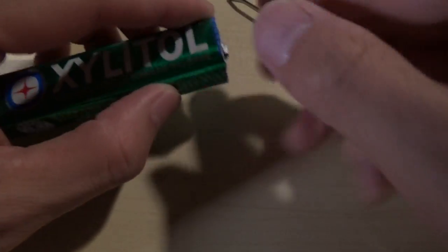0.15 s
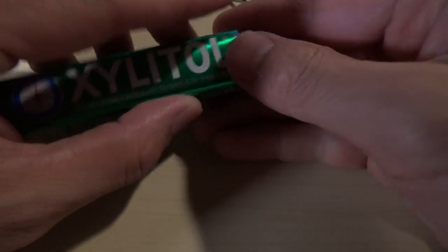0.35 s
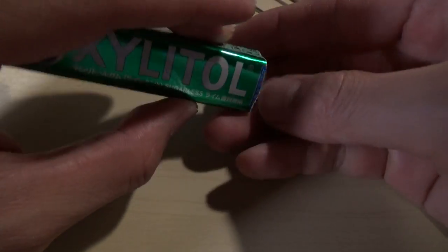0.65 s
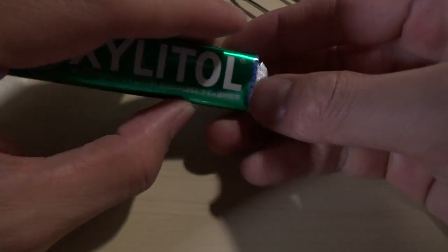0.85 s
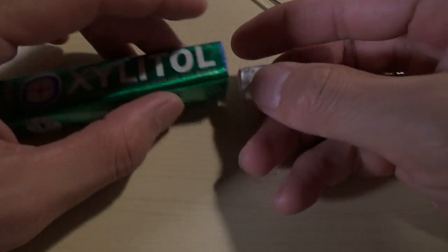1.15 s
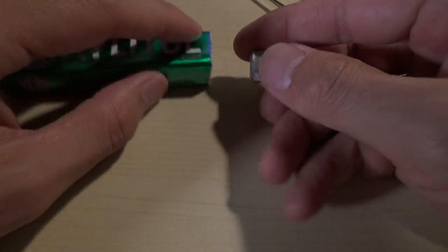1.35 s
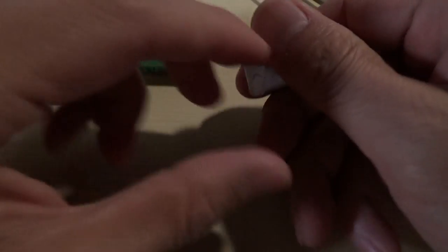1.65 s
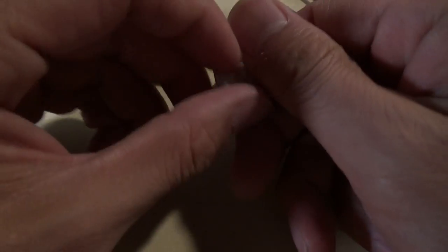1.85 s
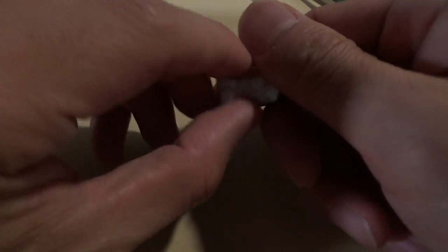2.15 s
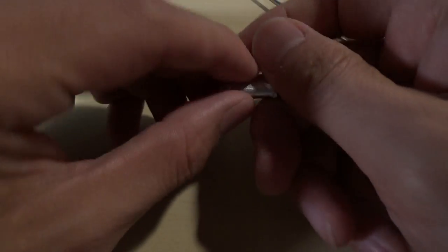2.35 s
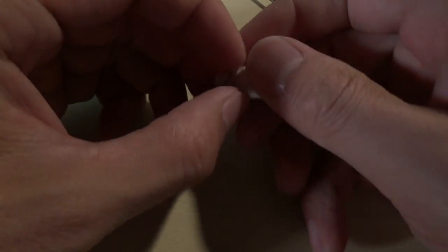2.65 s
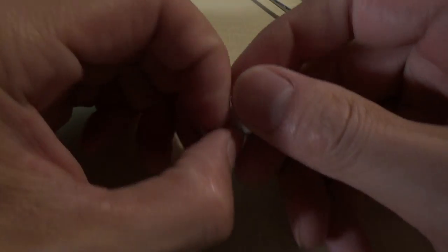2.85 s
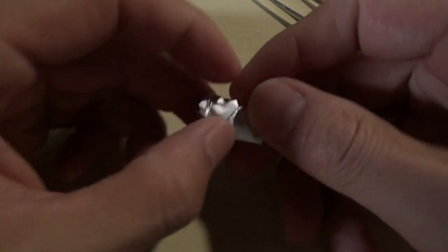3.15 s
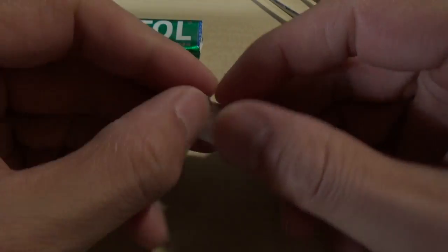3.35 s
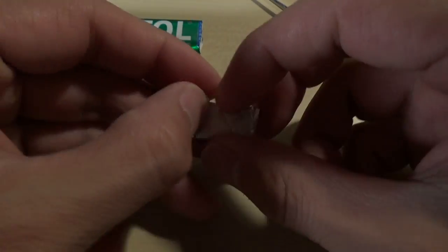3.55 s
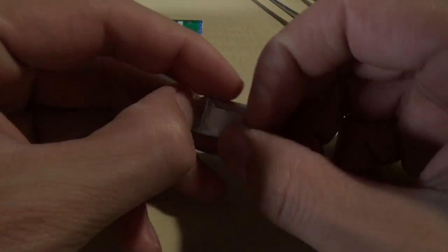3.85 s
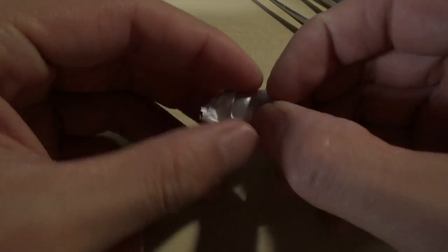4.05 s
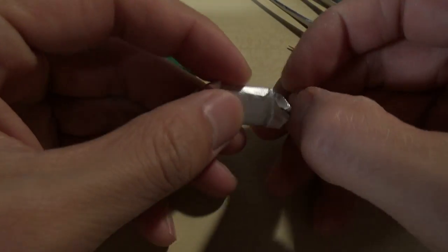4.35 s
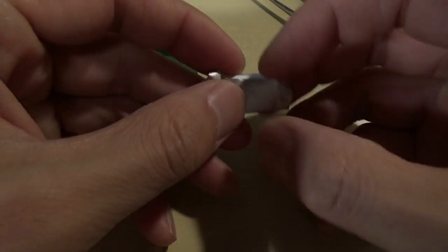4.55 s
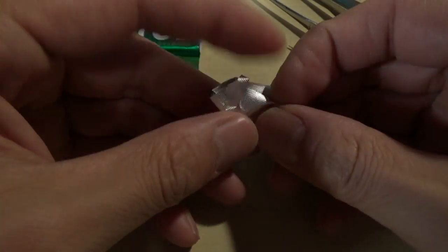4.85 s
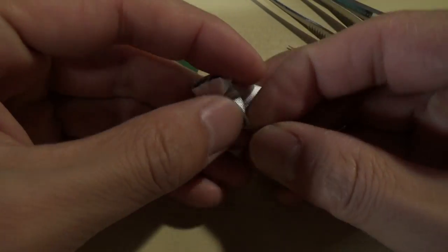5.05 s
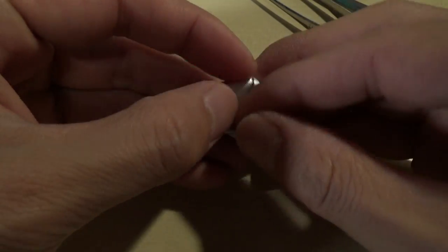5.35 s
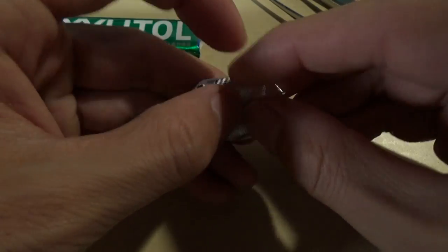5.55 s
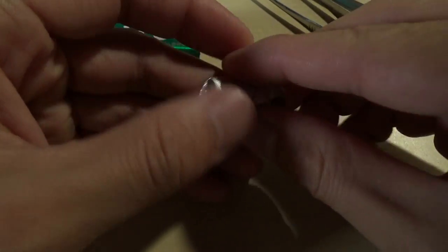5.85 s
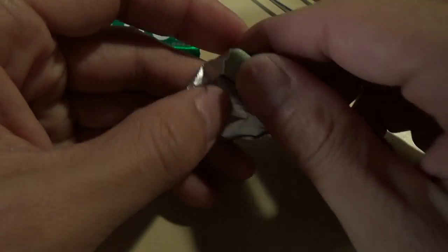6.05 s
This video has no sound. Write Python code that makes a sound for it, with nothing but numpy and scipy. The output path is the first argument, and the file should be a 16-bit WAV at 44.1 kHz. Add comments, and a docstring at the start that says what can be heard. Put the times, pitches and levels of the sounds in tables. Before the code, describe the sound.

Dull scuffs and knocks of a small pack, then sharp foil crinkling in clustered bursts, close by, over a faint low indoor hum.

```python
"""At a table in a quiet room, fingers slide a wrapped sweet out of a small stick pack and unfold its foil.
Creases snap as bursts of damped modes, and stuck folds peel open as fast trains of the same clicks.
The sheet rustles as clicks fed to short resonances, and a stiff fold rasps as filtered dense clicks.
Early on, scuffs and friction noise ring the pack's modes, and clicks ring steel tools on the table.
Below lie banded room noise and a faint hum of wavering sines."""
import sys
import numpy as np
from scipy import signal
from scipy.io import wavfile

SR = 44100
rng = np.random.default_rng(int(sys.argv[2]) if len(sys.argv) > 2 else 0)


def to_wav(s):
    """Save 16-bit WAV."""
    ch = np.atleast_2d(s).T  # columns
    pcm = np.round(np.clip(ch, -1, 1) * 32767)  # PCM
    wavfile.write(sys.argv[1], SR, pcm.astype(np.int16))


def to_linear_factor(level_db):
    """Convert decibel levels (scalar or array-like) to linear amplitude factors."""
    exponent = np.asarray(level_db, float) / 20
    return 10 ** exponent


N = 273861   # length in samples

# Spectrum of the room noise. Each row: frequency in Hz, relative density in dB.
ROOM_SPECTRUM = [(25, -1), (70, 0), (160, 1.5), (280, 10.5), (460, -5.5), (830, -0.5), (1500, -33),
                 (4500, -17.5), (16000, -24)]
ROOM_DB = -56.5   # rms, before the sides are lowered
# Hum lines. Each row: frequency in Hz, average level in dB rms, pitch wander in Hz.
HUM_LINES = [(99.9, -59.5, 3.13), (119.7, -62.5, 4.85), (211.9, -65, 6.08)]

# Fingers and contents rubbing the pack. Each row: peak time in seconds, drive level in dB,
# build-up in seconds, die-away in seconds.
RUBS = [(0.0, -42.5, 0.037, 0.084), (0.498, -56.5, 0.03, 0.52), (0.685, -39.5, 0.045, 0.032),
        (0.943, -45, 0.021, 0.058), (1.12, -35.5, 0.066, 0.1), (1.417, -49.5, 0.14, 0.13),
        (3.4, -58, 0.96, 0.38)]
PACK_AT_REST_DB = -64.5   # drive level between rubs
# Pack or table bumped. Each row: time in seconds, drive level in dB.
KNOCKS = [(0.297, -31.5), (0.503, -36.5), (0.6877, -18), (0.8474, -24), (1.105, -14.5), (4.336, -25.5)]
CONTACT_S = 0.006   # time for a knock's scuff to die by 60 dB
# Modes of the pack. Each row: frequency in Hz, relative strength in dB, time to die by 60 dB in seconds.
PACK_MODES = [(452, 1.5, 0.02), (800, 8, 0.011), (1227, 13, 0.0047), (1790, 12.5, 0.0036),
              (2810, 20.5, 0.0012)]

# Finger pushes that rustle the sheet. Each row: peak time in seconds, level in dB,
# build-up in seconds, die-away in seconds.
PUSHES = [(0.0, -37.5, 0.043, 0.049), (0.294, -37, 0.057, 0.039), (0.384, -38.5, 0.0049, 0.014),
          (0.498, -39.5, 0.029, 0.041), (0.561, -43, 0.082, 0.1), (0.86, -44.5, 0.047, 0.065),
          (0.677, -25.5, 0.02, 0.022), (0.732, -30.5, 0.018, 0.027), (0.936, -36.5, 0.0017, 0.07),
          (1.093, -34.5, 0.025, 0.15), (1.239, -35, 0.077, 0.018), (1.366, -43, 0.029, 0.47),
          (1.489, -41, 0.17, 0.0069), (1.669, -34.5, 0.042, 0.041), (1.915, -43, 0.29, 0.063),
          (2.201, -42.5, 0.059, 0.039), (2.337, -28.5, 0.077, 0.02), (2.624, -37.5, 0.064, 0.048),
          (2.8, -34, 0.016, 0.035), (2.845, -21, 0.0043, 0.02), (2.913, -18.5, 0.0074, 0.054),
          (3.103, -22.5, 0.032, 0.023), (3.212, -37, 0.37, 0.19), (3.36, -40, 0.083, 0.16),
          (3.66, -40, 0.27, 0.062), (3.86, -36.5, 0.089, 0.041), (3.971, -30, 0.053, 0.017),
          (4.065, -30, 0.019, 0.077), (4.332, -21.5, 0.072, 0.0039), (4.426, -37.5, 0.15, 0.0089),
          (4.499, -43, 0.04, 0.045), (4.76, -43, 0.12, 0.14), (4.96, -35.5, 0.039, 0.13),
          (5.162, -21.5, 0.073, 0.02), (5.2, -30.5, 0.12, 0.023), (5.379, -35, 0.23, 0.26),
          (5.44, -22, 0.0089, 0.086), (5.577, -29.5, 0.005, 0.046), (5.686, -31.5, 0.029, 0.19),
          (5.915, -28.5, 0.044, 0.016), (5.952, -33.5, 0.12, 0.15), (6.088, -47, 0.011, 0.68)]
RESTING_DB = -59   # fingers just holding the sheet
SWELL_DB = 20   # every build-up and die-away is the time to cross this range
# Colour of the small creases. Each row: frequency in Hz, relative level in dB.
FOIL_SPECTRUM = [(4600, -17.5), (6000, -1.5), (9000, 5), (12000, 2.5), (15500, -3)]
# Colour of the large folds. Each row: frequency in Hz, relative level in dB.
FOLD_SPECTRUM = [(1400, -12), (2400, -9), (3300, -1.5), (4800, -12), (15500, -4)]
# How large the folds in hand are. Each row: time in seconds, relative share of the rustle in dB.
FOLD_SHARE = [(0.0, 0), (0.96, 2), (1.22, -17), (1.33, 5), (1.6, -14), (2.9, -20), (3.1, -14),
              (4.95, -17.5), (5.15, -12), (5.4, -15), (5.72, -8.5), (5.91, -9.5), (6.21, -16)]
DULLING_DB_PER_OCTAVE = -1.18   # above 9 kHz, for each dB of large-fold share

# Small steel tools chattering when the table is jolted. Each row: peak time in seconds, drive level in dB,
# build-up in seconds, die-away in seconds.
RATTLES = [(0.008, -34, 0.031, 0.033), (0.73, -36, 0.018, 0.042), (1.156, -31, 0.011, 0.013),
           (1.178, -30.5, 0.025, 0.021)]
# Modes of the tools. Each row: frequency in Hz, relative strength in dB.
TOOL_MODES = [(285, -11), (600, 2.5), (755, -0.5), (1040, -7), (1290, -3), (3500, -0.5), (5850, -5.5),
              (7060, 1), (9130, -3)]
TOOLS_T60_S = 0.034   # time for a tool to die by 60 dB

# Creases snapping. Each row: time in seconds, peak level in dB, pitch in Hz.
SNAPS = [(0.249, -17.5, 8500), (0.309, -21.5, 5560), (0.5121, -19, 8550), (0.69, -15.5, 3260),
         (0.9499, -11.5, 2480), (1.0433, -15.5, 8100), (1.089, -21, 9700), (1.1053, -7, 2720),
         (1.2194, -15, 9600), (2.0594, -20, 11900), (2.098, -19.5, 11700), (2.292, -15, 10800),
         (2.7306, -17, 7300), (2.765, -23.5, 8040), (2.798, -13.5, 11200), (2.83, -9.5, 10100),
         (2.836, -22, 9100), (2.9023, -6, 9400), (2.9318, -5.5, 8900), (3.0544, -19, 8300),
         (3.07, -12, 8550), (3.092, -11, 6840), (3.102, -8.5, 9000), (3.1144, -5.5, 8800), (3.13, -6, 8300),
         (3.2474, -34, 10400), (3.344, -18, 12000), (3.3535, -7.5, 11100), (3.359, -22, 11900),
         (3.6866, -17.5, 9100), (3.691, -19, 12000), (3.7273, -11, 9900), (3.732, -6.5, 7200),
         (3.8945, -12.5, 14800), (3.928, -7, 11100), (3.935, -22, 10600), (3.951, -20, 8240),
         (4.0726, -12.5, 8600), (4.078, -15, 8950), (4.1531, -11, 10300), (4.1657, -12, 10900),
         (4.1762, -9, 11200), (4.187, -10, 11400), (4.202, -9.5, 11800), (4.2135, -6, 11700),
         (4.25, -12, 10600), (4.259, -11, 9300), (4.3175, -33, 10400), (4.326, -5, 7960), (4.337, -5, 6900),
         (4.375, -16.5, 10400), (4.381, -21, 9900), (4.619, -24, 11000), (4.652, -17, 8500),
         (4.704, -22, 5700), (4.7157, -5.5, 13800), (4.9764, -8, 9300), (5.129, -18, 6100),
         (5.296, -14, 7860), (5.301, -24, 6640), (5.32, -14, 9000), (5.3242, -10, 11100),
         (5.4264, -6.5, 9150), (5.431, -11.5, 7500), (5.4415, -8, 6500), (5.4865, -8.5, 9300),
         (5.5088, -5, 10600), (5.519, -12, 10100), (5.532, -7, 9450), (5.5415, -4, 8950),
         (5.572, -14, 10600), (5.583, -6.5, 8500), (5.5902, -12, 8200), (5.617, -16.5, 7700),
         (5.6255, -15.5, 8200), (5.655, -13.5, 6370), (5.6983, -8.5, 6300), (5.729, -9.5, 5970),
         (5.814, -21, 8400), (5.8423, -22, 9400), (5.889, -12.5, 7860), (5.9461, -11.5, 11200),
         (6.0045, -11.5, 4430), (6.042, -20.5, 10700), (6.0992, -18.5, 11200), (6.1105, -26, 12400),
         (6.1951, -14.5, 14300)]

# A stiff fold dragged under the thumb. Each row: peak time in seconds, level in dB,
# build-up in seconds, die-away in seconds.
RASPS = [(1.13, -47, 0.048, 0.061), (5.25, -51, 0.037, 0.2), (5.42, -40, 0.17, 0.13)]

# Folds peeling open in stick-slip. Each row: start in seconds, end in seconds, first slips per second,
# first level in dB, pitch in Hz.
PEELS = [(2.838, 2.88, 500, -16, 10700), (2.901, 2.924, 410, -11.5, 9500),
         (3.6384, 3.6736, 360, -11, 11400), (4.221, 4.2367, 420, -7.5, 11400),
         (4.2395, 4.248, 260, -13, 9200), (5.662, 5.7, 220, -13, 8300), (5.702, 5.736, 250, -15.5, 10100),
         (5.9074, 5.93, 325, -10, 11500), (6.148, 6.187, 110, -25, 11600)]
PEEL_SPEEDS_UP, PEEL_FADES_DB = 1.25, 3   # rate ratio and fade in dB from start to end


def rms_one(x):
    """Scale to rms 1."""
    return x / np.sqrt(np.mean(x ** 2) + 1e-20)


def at_hz(points, hz):
    """Read a spectrum in dB along a logarithmic frequency axis."""
    table_hz, table_db = np.transpose(points)
    return np.interp(np.log(hz), np.log(table_hz), table_db)


def cut(x, hz, kind, order=4):
    """Steep high- or low-pass."""
    return signal.sosfilt(signal.cheby1(order, 1, hz, kind, fs=SR, output="sos"), x)


def drift(rate):
    """Slow random wander of rms 1, from noise smoothed twice at a corner in Hz."""
    r = np.exp(-40 * np.pi * rate / SR)   # drawn at a twentieth of the sample rate
    noise = rng.standard_normal(N // 20 + 2002)
    slow = signal.lfilter([1], [1, -2 * r, r * r], noise)[2000:]
    return np.interp(np.arange(N) / 20, np.arange(len(slow)), rms_one(slow))


def ring(drive, hz, t60):
    """One damped mode; a unit click rings at about height 1 and dies by 60 dB in t60 seconds."""
    r = to_linear_factor(-60 / (t60 * SR))
    w = 2 * np.pi * hz / SR
    return signal.lfilter([0, np.sin(w)], [1, -2 * r * np.cos(w), r * r], drive + 1e-18)


def clicks(per_s, size_db, clump_db=4.5):
    """Clumped random clicks of uneven size and either sign; rms 1."""
    sizes = to_linear_factor(size_db * np.minimum(rng.exponential(1, N), 6)) * rng.choice([-1, 1], N)
    chance = per_s * to_linear_factor(clump_db * drift(60)) / SR
    return rms_one(sizes * (rng.random(N) < chance))


def swells(rows, rest_db):
    """Each movement swells evenly in dB to its peak and dies away; powers add over rest; result in dB."""
    t = np.arange(0, N + 32, 32) / SR
    power = to_linear_factor(2 * rest_db)
    for s, db, build, die in rows:
        fall = SWELL_DB * np.maximum((s - t) / build, (t - s) / die)
        power = power + to_linear_factor(2 * (db - fall))
    return np.interp(np.arange(N) / SR, t, 10 * np.log10(power))


def dullness(s):
    """Share of the large folds at time s, in dB."""
    return np.interp(s, *np.transpose(FOLD_SHARE))


def add(out, s, sound):
    """Lay a short sound at time s."""
    i = int(s * SR)
    out[i:i + len(sound)] += sound[:N - i]


def room_noise():
    """Half-octave bands of mid and side noise that flicker a little, with narrow wavering hum lines."""
    out = 0
    edges = 25 * 2 ** np.arange(0, 9.6, .5)
    white = rng.standard_normal((2, 2, N))   # neighbouring bands take different noise
    for k, (low, high) in enumerate(zip(edges, edges[1:])):
        band_pass = signal.butter(2, [low, high], "band", fs=SR, output="sos")
        band = signal.sosfilt(band_pass, white[k % 2])
        out = out + band * to_linear_factor(at_hz(ROOM_SPECTRUM, np.sqrt(low * high)) + 3.67 * drift(16.7))
    mid, side = to_linear_factor(ROOM_DB) * cut(rms_one(out), 20000, "low", order=8)
    for hz, db, width in HUM_LINES:
        phase = 2 * np.pi * np.cumsum(hz + width * drift(5.06)) / SR
        mid = mid + np.sqrt(2) * to_linear_factor(db + 2.5 * drift(8)) * np.sin(phase)
    return mid + to_linear_factor(-10) * cut(side, 90, "high", order=2) * [[1], [-1]]


def pack():
    """Friction noise and knocks drive the same damped modes; each knock strikes them in new proportions."""
    rub_db = swells(RUBS, PACK_AT_REST_DB)
    friction = rng.standard_normal(N) * to_linear_factor(rub_db + 1.37 * drift(60))
    knock_s, knock_db = np.transpose(KNOCKS)
    at = (knock_s * SR).astype(int)
    # a knock is a short ragged scuff
    scuff = to_linear_factor(-60 * np.arange(400) / (CONTACT_S * SR)) * rng.standard_normal(400)
    scuff = cut(scuff / np.linalg.norm(scuff), 3600, "low", order=1)
    out = np.zeros(N)
    for hz, db, t60 in PACK_MODES:
        blows = np.zeros(N)
        blows[at] = to_linear_factor(knock_db + db - 14 + rng.normal(0, 4, len(at)))
        rubbing = friction * to_linear_factor(db - 24 + 3 * drift(10))
        out += ring(rubbing + signal.lfilter(scuff, [1], blows), hz, t60)
    return cut(cut(out, 4600, "low", order=2), 152, "high", order=2)


def grains(pitches, spectrum, ticks, cycles, tilt_db):
    """Tiny clicks dealt to short resonances of wandering strength; the larger ticks reach them all."""
    fine = clicks(20000, size_db=4.0, clump_db=3.0)
    dealt = rng.integers(0, len(pitches), N)
    out = 0
    for k, hz in enumerate(pitches):
        drive = fine * (dealt == k) + (-1) ** k * ticks
        voice = rms_one(ring(drive, hz, cycles / hz))
        octaves_up = max(np.log2(hz / 9000), 0)
        db = at_hz(spectrum, hz) + tilt_db * octaves_up + 3.5 * drift(6)
        out = out + voice * to_linear_factor(db) * np.sqrt(hz)
    return rms_one(out)


def rustle():
    """Many small creases at once: bright grains, and broader, duller ones from the larger folds."""
    low_db = dullness(np.arange(N) / SR)
    snap_s, snap_db, _ = np.transpose(SNAPS)
    jolts = np.zeros(N)
    jolts[(snap_s * SR).astype(int)] = to_linear_factor(snap_db - 19)
    settling = signal.lfilter([1], [1, -to_linear_factor(-60 / (0.016 * SR))], jolts)   # the sheet settles after a snap
    level = to_linear_factor(swells(PUSHES, RESTING_DB)) + settling
    ticks = to_linear_factor(-19) * clicks(200, size_db=2.5)
    tilt_db = DULLING_DB_PER_OCTAVE * np.minimum(low_db + 17, 10)   # no tilt at a share of -17 dB
    bright = grains(np.geomspace(4400, 16000, 14), FOIL_SPECTRUM, ticks, cycles=32.0, tilt_db=tilt_db)
    dull = grains(np.geomspace(1500, 15000, 15), FOLD_SPECTRUM, ticks, cycles=20.0, tilt_db=tilt_db)
    bright = cut(bright, 4500, "high")
    dull = to_linear_factor(low_db + 2) * cut(dull, 1400, "high", order=2)
    return level * (bright + dull)


def tools():
    """Uneven clicks set the steel's modes ringing, in slowly wandering proportions."""
    touches = cut(clicks(1500, size_db=3.0) * to_linear_factor(swells(RATTLES, -99)), 200, "high")
    out = 0
    for hz, db in TOOL_MODES:
        out = out + ring(touches * to_linear_factor(db + 2.5 * drift(8)), hz, TOOLS_T60_S)
    return to_linear_factor(-21) * out


def buckle(hz, low_db, count=40):
    """One crease letting go: dense modes strongest round its pitch, dying at once but for a faint after-ring."""
    t = np.arange(400) / SR
    draw = rng.standard_normal((count, 4))
    modes = np.linspace(1900, 16300, count)[:, None] + 150 * draw[:, :1]
    broad = np.where(modes < 4300, to_linear_factor(low_db - 2), to_linear_factor(-18))
    weight = np.exp(-.5 * (np.log(modes / hz) / 0.23) ** 2) + broad
    # the crease runs, so modes start slightly apart
    late = np.maximum(t - .0001 * np.abs(draw[:, 3:]), 0)
    t60 = .0026 * np.exp(.3 * draw[:, 1:2])
    fade = to_linear_factor(-60 * late / t60) + to_linear_factor(-19 - 60 * late / .012)
    sound = np.sum(weight * draw[:, 2:3] * fade * np.sin(2 * np.pi * modes * late), axis=0)
    # a small patch of sheet radiates no bass
    edge_hz = min(2300 + 2200 * (1 - min(to_linear_factor(low_db + 11), 1)), 0.27 * hz)
    sound = cut(sound, edge_hz, "high")
    return sound / np.abs(sound).max()   # peak 1


def snaps():
    """Single creases buckle, each with its own modes."""
    out = np.zeros(N)
    for s, db, hz in SNAPS:
        add(out, s, to_linear_factor(db) * buckle(hz, dullness(s)))
    return out


def rasp():
    """A dragged stiff fold: dense clicks heard through its one broad band."""
    band = cut(cut(clicks(4000, size_db=2.5), 2800, "high"), 4200, "low")
    return to_linear_factor(swells(RASPS, -99)) * rms_one(band)


def peels():
    """A peeling fold slips almost evenly, ever faster and on the whole fainter; its slips share a colour."""
    out = np.zeros(N)
    for start, end, per_s, db, hz in PEELS:
        shared = buckle(hz, dullness(start) - 5)
        s = start
        for jitter, size in rng.standard_normal((20, 2)):
            own = buckle(hz, dullness(start))
            done = (s - start) / (end - start)
            if done <= 1:
                slip_db = db - done * PEEL_FADES_DB + 1.6 * size
                add(out, s, to_linear_factor(slip_db) * (1.1 * shared + .4 * own))
            s += np.exp(0.07 * jitter) / (per_s * (1 + done * (PEEL_SPEEDS_UP - 1)))
    return out


def scene():
    """Everything in hand and on the table close to the microphones, over the room."""
    near = pack() + rustle() + tools() + snaps() + rasp() + peels()
    near = cut(near, 15660, "low", order=8)
    # the fingers wander a little left and right, heard most near 8 kHz
    treble = to_linear_factor(-19) * signal.lfilter(*signal.iirpeak(8000, 2.5, fs=SR), near)
    side = drift(30) * (treble + to_linear_factor(-25) * cut(near, 3000, "low"))
    return near + side * [[1], [-1]] + room_noise()


def band_limit(x):
    """A steep low-pass at the top of the band."""
    return signal.sosfilt(signal.butter(12, 17030, fs=SR, output="sos"), x)


def record(dry):
    """The microphones lose the deep bass; gain control ducks after loud snaps."""
    t = np.arange(N) / SR
    x = cut(dry, 47, "high", order=2)
    peak_db = 20 * np.log10(np.abs(x).max(axis=0) + 1e-9)
    over = np.maximum(peak_db + 16, 0)   # dB above a threshold of -16
    held = np.maximum.accumulate(over + 9 * t) - 9 * t   # lets go at 9 dB per second
    duck_db = -.35 * signal.lfilter([.005], [1, -.995], held)
    return band_limit(x * to_linear_factor(duck_db))


dry = scene()
out = record(dry)
to_wav(out)
```